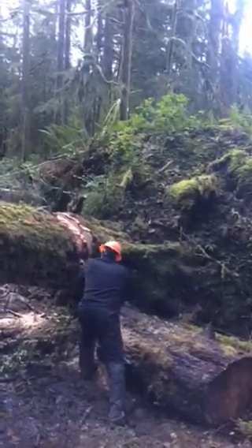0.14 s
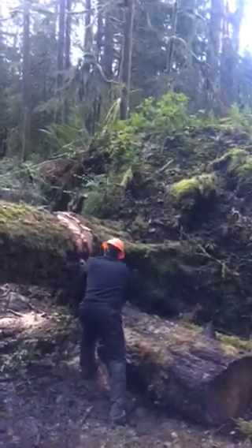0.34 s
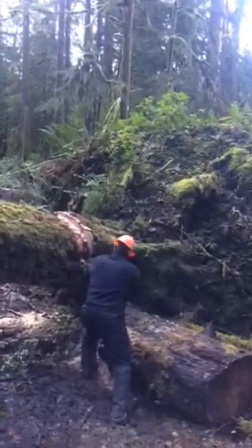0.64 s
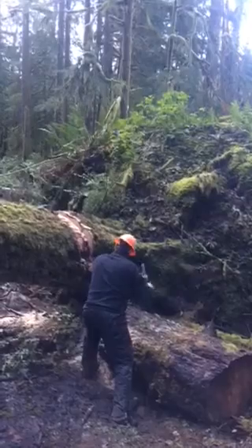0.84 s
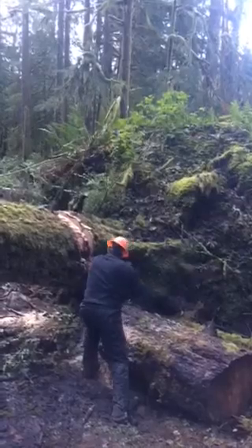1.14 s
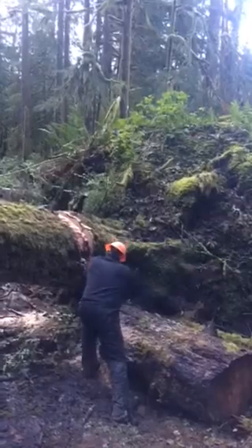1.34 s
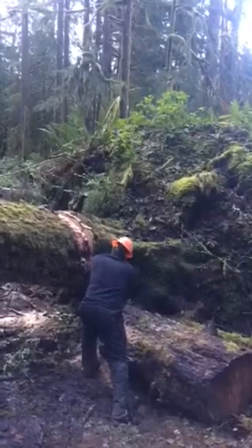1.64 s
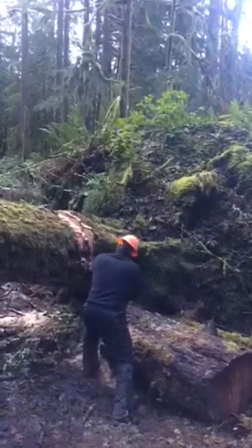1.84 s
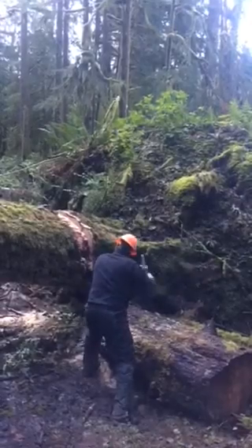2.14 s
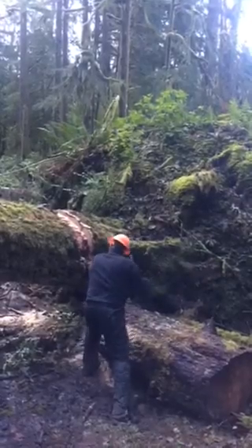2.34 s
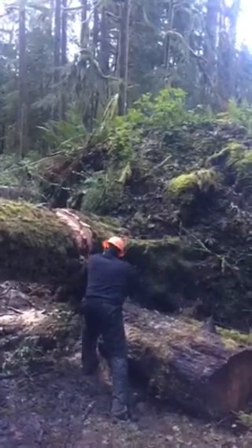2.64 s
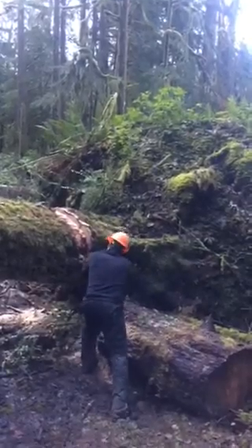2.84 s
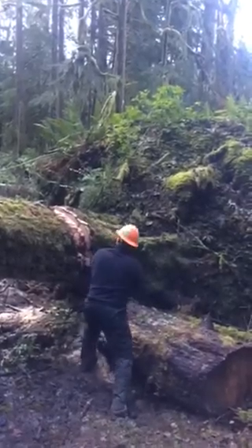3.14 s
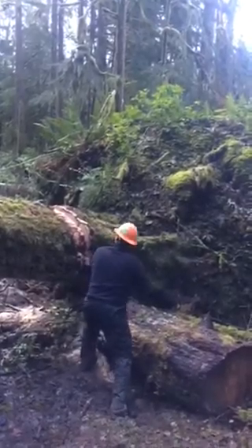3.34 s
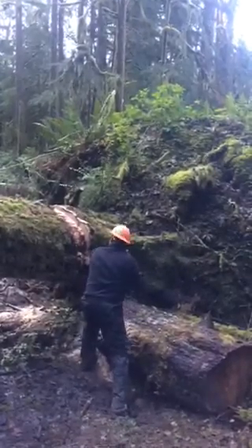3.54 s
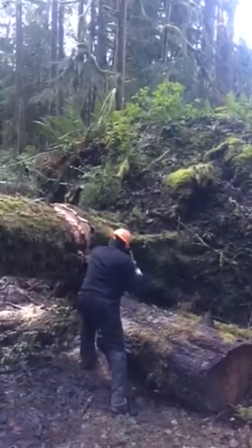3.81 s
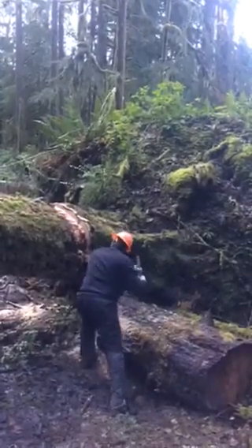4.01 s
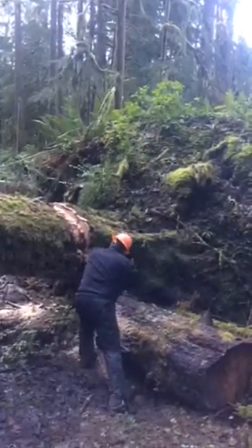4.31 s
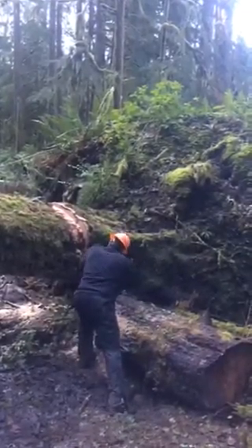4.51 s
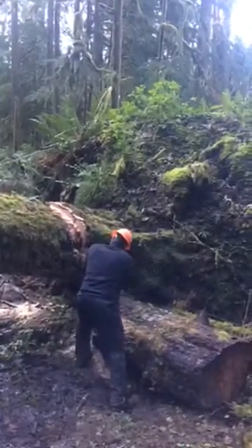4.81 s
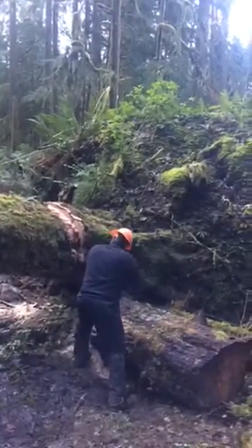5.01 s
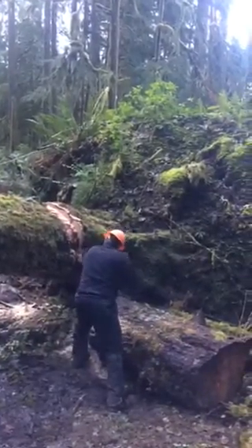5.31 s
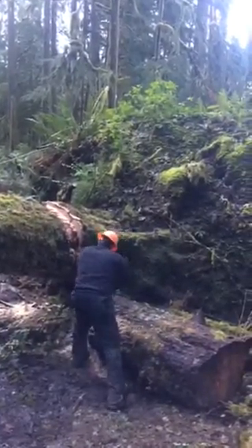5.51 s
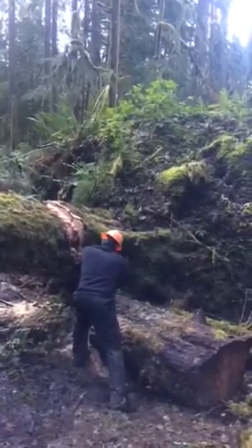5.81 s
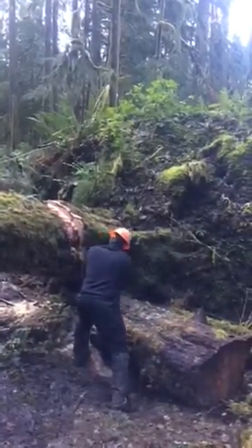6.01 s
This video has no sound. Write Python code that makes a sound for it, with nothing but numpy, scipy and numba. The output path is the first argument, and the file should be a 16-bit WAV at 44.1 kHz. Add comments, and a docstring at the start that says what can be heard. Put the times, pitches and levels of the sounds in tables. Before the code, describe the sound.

Coarse, slow hand-sawing of a thick log outdoors: harsh rasping pulls, lighter return strokes, a few blade knocks and chirps over faint air.

```python
"""A long crosscut saw is pulled and pushed by hand through a big log, a few metres away in a quiet forest.
The rasp is dense fibre snaps and hiss, pulsed by biting teeth and shaped by the force of each stroke.
Snags are bursts of snaps, knocks are a click and chatter through ringing modes, squeaks are unsteady sines.
Log and blade colour the rasp, noise tails scatter the saw off bank and trunks, and filtered noise is the air.
A phone microphone adds a peak near 3 kHz; both channels carry the same sound."""
import sys
import numpy as np
from scipy import signal
from scipy.fft import rfft, irfft, next_fast_len
from scipy.io import wavfile
from scipy.ndimage import uniform_filter1d
from numba import njit

SR = 44100
rng = np.random.default_rng(int(sys.argv[2]) if len(sys.argv) > 2 else 0)


def digitize_waveform(pressure):
    """Quantize a signal to 16-bit integers and store it at the path in sys.argv[1].

    Rows of a 2-D input are taken as channels; values are limited to [-1, 1].
    """
    field = np.atleast_2d(pressure).T
    bounded = np.clip(field, -1, 1)
    quanta = np.round(bounded * 32767).astype(np.int16)
    wavfile.write(sys.argv[1], SR, quanta)


N = 271656
TIME = np.arange(N) / SR
SIZE = next_fast_len(N + SR, True)  # room for a one-second tail
HZ = np.fft.rfftfreq(SIZE, 1 / SR) + 1e-3  # kept just above zero for logs and divisions


def undb(db):
    """Decibels to gain."""
    return 10 ** (np.asarray(db) / 20)


def unit(x):
    """Scale to rms 1."""
    return x / np.sqrt(np.mean(np.abs(x) ** 2))


def filtered(x, response):
    """Pass a sound through a frequency response."""
    return irfft(rfft(x, SIZE) * response, SIZE)[:N]


def colour(points):
    """Causal (minimum-phase) response with the given (Hz, dB) outline."""
    hz, db = np.transpose(points)
    outline_db = np.interp(np.log(HZ), np.log(hz), db)
    cepstrum = irfft(np.log(undb(outline_db)), SIZE)
    # fold the cepstrum forward in time, so that nothing sounds early
    cepstrum[1:SIZE // 2] *= 2
    cepstrum[SIZE // 2 + 1:] = 0
    return np.exp(rfft(cepstrum))


def resonances(modes):
    """Response that lifts (or dips) each (Hz, width Hz, dB) mode from a flat line."""
    response = 1
    for hz, width, db in modes:
        peak = 1 / (1 + 1j * (HZ ** 2 - hz ** 2) / (HZ * width))
        response = response * (1 + (undb(db) - 1) * peak)
    return response


def lowpass(hz, order):
    """Causal response that falls, above hz, by 6 dB an octave for each order."""
    return signal.freqs(*signal.butter(order, 1, analog=True), HZ / hz)[1]


def highpass(hz, order):
    """Causal response that rises, up to hz, by 6 dB an octave for each order."""
    return signal.freqs(*signal.butter(order, 1, "high", analog=True), HZ / hz)[1]


def walk(rate):
    """Smooth random wander with rms 1, heading for a new value rate times a second."""
    hold = int(SR / rate)
    steps = np.repeat(rng.standard_normal(N // hold + 2), hold)
    return unit(uniform_filter1d(steps, hold)[:N])


# Resonances of log and blade under the teeth. Each row: frequency in Hz, width in Hz, lift in dB.
LOG_AND_BLADE = [(396, 73, 7.5), (675, 74, 7), (877, 220, 3.5), (1400, 23, -1.5), (1491, 97, 8.5),
                 (1664, 82, 5), (1960, 112, 8), (2490, 230, 7), (3745, 160, 3.5), (4240, 89, 6),
                 (4680, 66, 7.5), (5470, 140, 3)]
# Spectrum of tearing fibres. Each row: frequency in Hz, relative level in dB.
TEARING = [(30, -28), (80, -18), (200, -8.5), (450, -14), (700, -5.5), (1100, -4), (1600, -4.5),
           (2300, -4.5), (2800, 0), (3400, -1), (4000, -4.5), (5000, -3.5), (6500, -15), (10000, -27),
           (15000, -37)]


def rasp(body):
    """Teeth grind the log (low), snap single fibres (middle) and brush through sawdust (top)."""
    wood, force, bright = sawing()
    bites = teeth(20 * np.log10(force), bites_per_s=35, bite_share=0.57, depth_db=4, uneven_db=2.5)
    tone = unit(colour(TEARING) * body)
    wood_hz, dust_hz = 1900, 6300  # where grinding gives way to snaps, and snaps to dust
    grind_tone = tone * lowpass(wood_hz, order=4)
    fibre_tone = tone * highpass(wood_hz, order=4) * lowpass(dust_hz, order=4)
    dust_tone = tone * highpass(dust_hz, order=4)
    grind = filtered(snaps(per_s=1500, spread_db=2.5) * bites, grind_tone)
    fibres = filtered(snaps(per_s=3600, spread_db=3) * bites, fibre_tone)
    dust = filtered(rng.standard_normal(N) * bites, dust_tone)
    cut = wood * grind + force * fibres + bright * dust
    return cut + blade_ring(cut, width_hz=450)


# Pulls, the cutting strokes. Each row: start in seconds, fastest moment in seconds, end in seconds,
# force in dB, swell exponent, woody share in dB, bright share in dB,
# blade ring at the start in Hz, blade ring at the end in Hz, ring level against the cut in dB.
PULL_STROKES = [(-.12, 0.118, .36, -31, 1.53, 0, 0.5, 3870, 2100, -4),
                (1.048, 1.42, 1.608, -34, 3.04, 0, 1, 5500, 1420, -6),
                (2.26, 2.617, 2.903, -34, 2.99, -0.5, 1, 4170, 1900, -9),
                (4.172, 4.529, 4.75, -39, 1.4, -0.5, -1, 4396, 1140, -3),
                (5.3, 5.65, 5.856, -34, 3.12, 1, -0.5, 4600, 1814, -9)]
# Pushes, the lighter strokes back, and at 3.8 s a faint easing of the blade.
# Each row: start in seconds, fastest moment in seconds, end in seconds,
# force in dB, swell exponent, woody share in dB, bright share in dB.
PUSHES_AND_EASING = [(0.337, .81, 1.09, -39.5, 2.3, -1.5, 0), (1.571, 2.057, 2.274, -39.5, 2.16, -1, -0.5),
                     (2.859, 3.251, 3.52, -46, .55, 3, 2), (3.8, 4.092, 4.21, -61, 0.48, 2, -6),
                     (4.719, 5.059, 5.35, -40.5, 1.9, -.5, -2), (5.829, 6.255, 6.49, -43, 1.07, 2.5, -1.5)]
# The blade sticks for a moment and the rasp drops.
# Each row: middle in seconds, depth in dB, half length in seconds.
STICKING = [(0.036, -9, .028), (0.534, -6.5, .03), (2.416, -6.5, .03), (2.525, -12, 0.016),
            (3.101, -7, 0.034), (4.309, -5, 0.029), (5.522, -10, .014)]
REST_DB = -75  # a faint rub in the kerf under all strokes
SLIDE_DB, SLIDE_S = 12, 0.14  # extra hiss while the blade slides in at the start of a pull


def sawing():
    """Pulls, pushes and one faint easing of the blade before a pull, broken where the blade sticks."""
    # three rows: strengths of grinding, fibre snaps and dust
    drive = undb(REST_DB) + sum(stroke(*row) for row in PUSHES_AND_EASING)
    for start, *pull in PULL_STROKES:
        wood, force, dust = stroke(start, *pull[:6])
        slide = np.exp(-((TIME - start) / SLIDE_S) ** 4)
        drive = drive + np.array([wood, force, dust * undb(SLIDE_DB * slide)])
    drop_db = sum(db * np.exp(-((TIME - s) / length) ** 2) for s, db, length in STICKING)
    return drive * undb(drop_db)


RELEASE_EXPONENT = 2.5  # how steeply the force falls as a stroke slows
SLOW_WOOD_DB, SLOW_BRIGHT_DB = 1, -2.5  # a slower blade grinds more than it cuts


def stroke(start, fastest, end, db, swell, wood_db, bright_db):
    """The arm speeds up and slows down, and the force follows: strengths of grinding, snaps and dust."""
    speed = np.sin(np.pi / 2 * np.interp(TIME, [start, fastest, end], [0, 1, 0]))
    exponent = np.where(TIME < fastest, abs(swell), RELEASE_EXPONENT)
    force = undb(db) * speed ** exponent
    slow = 1 - speed
    return force * undb([wood_db + SLOW_WOOD_DB * slow, np.zeros(N), bright_db + SLOW_BRIGHT_DB * slow])


def teeth(force_db, bites_per_s, bite_share, depth_db, uneven_db):
    """Each tooth bites and lets go; bites come faster where the stroke is strong."""
    speed = undb(.2 * (force_db - force_db.max()))
    travel = np.cumsum(bites_per_s * speed * np.exp(.2 * walk(20))) / SR  # counted in teeth
    grip_db = uneven_db * rng.standard_normal(N)[travel.astype(int)]  # one draw for each tooth
    return unit(undb((depth_db + grip_db) * np.exp(-(travel % 1) / bite_share)))


def snaps(per_s, spread_db):
    """Dense clicks of unequal size and random sign, rms 1: single fibres breaking."""
    size = undb(spread_db * np.clip(rng.standard_normal(N), -2, 2))
    return unit((rng.random(N) < per_s / SR) * size * rng.choice([-1, 1], N))


def blade_ring(cut, width_hz):
    """On a pull the free end of the blade grows longer, so its ring sweeps down."""
    ring = np.zeros(N)
    for start, _, end, *_, from_hz, to_hz, db in PULL_STROKES:
        drawn = np.clip((TIME - start) / (end - start), 0, 1)
        hz = from_hz * (to_hz / from_hz) ** drawn
        driven = cut * np.sqrt(4 * drawn * (1 - drawn)) + 1e-18  # tiny offset keeps the filter from stalling
        ring += undb(db) * moving_band(driven, hz, float(width_hz))
    return ring


@njit
def moving_band(x, hz, width):
    """State-variable band-pass whose centre glides; gain 1 at the centre."""
    y, band, low = np.empty(len(x)), 0., 0.
    for i in range(len(x)):
        g, damping = np.tan(np.pi * hz[i] / SR), width / hz[i]
        v = (band + g * (x[i] - low)) / (1 + g * (g + damping))
        band = 2 * v - band
        low = low + 2 * g * v
        y[i] = damping * v
    return y


# Teeth that snag and rip through a bundle of fibres. Each row: start in seconds, level in dB, length in seconds.
SNAGGED_TEETH = [(0.068, -29.5, .014), (0.219, -33, 0.0085), (1.337, -34, 0.014), (1.424, -28, 0.025),
                 (2.066, -33, 0.013), (2.1, -37.5, 0.01), (2.445, -36.5, .012), (2.457, -28, .011),
                 (2.479, -33.5, 0.013), (2.549, -31.5, 0.015), (2.588, -28, .02), (3.717, -53, 0.025),
                 (4.239, -39.5, 0.0062), (4.279, -43.5, 0.0091), (4.564, -38, .03), (4.883, -46, .008),
                 (4.956, -38.5, 0.013), (5.479, -37.5, 0.0051), (5.504, -37.5, 0.013), (5.543, -33, 0.017),
                 (5.58, -28, 0.025), (5.699, -23, 0.0032)]


def snags(body):
    """A caught tooth rips free in a short, dense burst of snaps."""
    force = np.zeros(N)
    for s, db, length in SNAGGED_TEETH + skips():
        age = np.maximum(TIME - s, 0)
        force += undb(db) * (1 - np.exp(-age / 0.00032)) * np.exp(-(age / length) ** 2)
    tone = unit(colour(TEARING) * body * lowpass(9800, order=1) * highpass(470, order=1))
    return filtered(force * snaps(per_s=9000, spread_db=7), tone)


# Early in a push the teeth catch one after another.
# Each row: first catch in seconds, last catch in seconds, count of teeth, first level in dB, last level in dB.
CATCHING_RUNS = [(0.45, 0.611, 4, -47, -43), (3.054, 3.289, 6, -41, -38)]
SKIP_LENGTH_S = 0.017  # length of each catch
SKIP_LAG, SKIP_SPEEDUP = .55, 0.44  # the first gap is longer by the lag, which shrinks tooth by tooth


def skips():
    """Runs of snags, one for each tooth, that quicken with the blade: (s, level dB, length s)."""
    rows = []
    for first, last, count, first_db, last_db in CATCHING_RUNS:
        gaps = 1 + SKIP_LAG * SKIP_SPEEDUP ** np.arange(round(count))
        along = np.cumsum(gaps) - gaps
        for u in along / along[-1]:
            rows.append((first + u * (last - first), first_db + u * (last_db - first_db), SKIP_LENGTH_S))
    return rows


# The blade knocks against the kerf and chatters. Each row: start in seconds, level in dB,
# chatter decay in seconds, hardness (treble limit) in Hz, loudest ring in Hz.
BLADE_KNOCKS = [(.216, -33.5, 0.0084, 1810, 820), (1.434, -29.5, 0.0041, 5000, 2480),
                (2.478, -40, 0.026, 900, 745), (2.588, -19.5, 0.014, 8000, 1280),
                (3.811, -33, 0.0085, 6960, 1400), (3.817, -36.5, 0.023, 7000, 1900),
                (3.892, -43, 0.035, 3170, 567)]
# Spectrum of a knock. Each row: frequency in Hz, relative level in dB.
KNOCK_COLOUR = [(30, -28), (80, -19), (200, -11), (450, -6.5), (750, -5), (1250, -4), (1700, -6.5),
                (3000, -2), (4000, -10.5), (5000, -9), (6500, -23.5), (10000, -35), (15000, -36)]
# Modes that a knock sets ringing. Each row: frequency in Hz, width in Hz, lift in dB.
KNOCK_MODES = [(216, 34, 7), (366, 49, 7.5), (617, 22, 6.5), (848, 18, 10), (1260, 55, 1), (1367, 24, 5),
               (1580, 23, 10.5), (1952, 7.1, 11), (2190, 39, 3.5), (2650, 50, -6.5), (2880, 22, 2),
               (3075, 40, 4), (4180, 25, -7), (4510, 27, 8)]


def knocks(slap_db, ring_db):
    """The blade slaps the side of the kerf and chatters to rest; where and how hard it lands sets the colour."""
    tone = unit(colour(KNOCK_COLOUR) * resonances(KNOCK_MODES))
    chatter = snaps(per_s=6000, spread_db=1.0)
    out = np.zeros(N)
    for s, db, decay, hard_hz, ring_hz in BLADE_KNOCKS:
        age = np.maximum(TIME - s, 0)
        force = chatter * (1 - np.exp(-age / 0.001)) * np.exp(-age / decay)
        force[int(s * SR)] += undb(slap_db)  # the slap is a single click
        spot = resonances([(ring_hz, ring_hz / 4, ring_db)]) * lowpass(hard_hz, order=2)
        out += undb(db) * filtered(force, tone * spot)
    return out


# The blade binds in the kerf and gives a short, rough squeak.
# Each row: middle in seconds, average pitch in Hz, level in dB, half length in seconds.
BLADE_SQUEAKS = [(0.155, 2626, -37, 0.015), (1.277, 3610, -30, 0.0073), (1.342, 3174, -34.5, 0.016),
                 (1.416, 1980, -28, 0.0098), (1.437, 3260, -28, 0.0022), (2.45, 3080, -33, 0.0017),
                 (2.484, 3090, -32, 0.0029), (4.511, 546, -35.5, 0.0052), (4.567, 1638, -37, 0.03),
                 (5.7004, 3113, -21.5, 0.0012)]


def squeaks(waver):
    """Steel sticks and slips on the wood; the pitch is too unsteady to make a clean note."""
    clock = np.cumsum(1 + waver * walk(600)) / SR  # time that runs unevenly, so pitch wavers
    grip = unit(undb(4.1 * walk(250)))
    out = np.zeros(N)
    for s, hz, db, length in BLADE_SQUEAKS:
        swell = np.exp(-((TIME - s) / length) ** 2)
        out += undb(db) * swell * np.sin(2 * np.pi * hz * clock)
    return out * grip


def thud(s, hz, db, length):
    """A soft, low bump: a sine that swells and fades around its middle."""
    age = TIME - s
    return undb(db) * np.exp(-(age / length) ** 2) * np.sin(2 * np.pi * hz * age)


def near_echoes(saw, t60, db, count):
    """Short paths by way of log and bank; their mix wanders at random, as blade and sawyer move."""
    weights = np.array([walk(7) for _ in range(count)])
    weights /= np.linalg.norm(weights, axis=0)
    return sum(scatter(saw * weight, t60, db, top_hz=11000) for weight in weights)


def scatter(x, t60, db, top_hz):
    """Many small reflections, dulled in the treble, that fall by 60 dB in t60 seconds."""
    age = TIME[:SR]
    tail = rng.standard_normal(SR) * undb(-60 * age / t60) * (1 - np.exp(-age / 0.00081))
    dulling = 1 + 1j * HZ / top_hz
    return undb(db) * filtered(x, rfft(tail / np.linalg.norm(tail), SIZE) / dulling)


# Spectrum of the forest air. Each row: frequency in Hz, relative level in dB.
AIR_COLOUR = [(20, -34), (40, -18), (60, -6.5), (110, -9), (200, 1), (400, 0), (800, -1), (1500, -6),
              (2500, -7.5), (3300, -14.5), (4000, -23), (5000, -31), (7000, -35), (10000, -37.5),
              (15000, -40)]
AIR_DB = -54  # middle level of the rush


def forest_air():
    """A faint rush of coloured noise that wavers a little in level."""
    rush = filtered(rng.standard_normal(N), unit(colour(AIR_COLOUR)))
    return rush * undb(AIR_DB + .5 * walk(3.5))


def scene():
    """The saw, its echoes from the near bank and the far trunks, a bump and the air; one microphone."""
    body = resonances(LOG_AND_BLADE)
    saw = rasp(body) + snags(body) + knocks(slap_db=16.5, ring_db=11.0) + squeaks(waver=0.03486)
    bank = near_echoes(saw, t60=.12, db=-8.5, count=6)
    trunks = scatter(saw, t60=0.5, db=-15.5, top_hz=3500)
    bump = thud(s=5.455, hz=75, db=-48, length=0.012)
    mono = saw + bank + trunks + bump + forest_air()
    return np.array([mono, mono])


# Resonances of the microphone port. Each row: frequency in Hz, width in Hz, lift in dB.
MIC_PORT = [(2952, 241, 6), (3176, 318, 10.5)]
TOP_HZ = 15250  # upper limit of the microphone's sound


def record(dry):
    """The microphone port rings near 3 kHz, and a steep low-pass cuts the top."""
    port = resonances(MIC_PORT)
    heard = np.array([filtered(channel, port) for channel in dry])
    return signal.sosfilt(signal.ellip(10, .2, 70, TOP_HZ, fs=SR, output="sos"), heard)


dry = scene()
out = record(dry)
digitize_waveform(out)
```